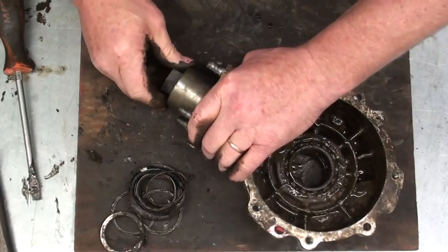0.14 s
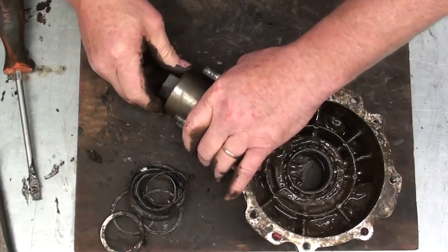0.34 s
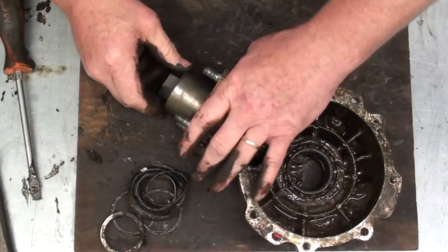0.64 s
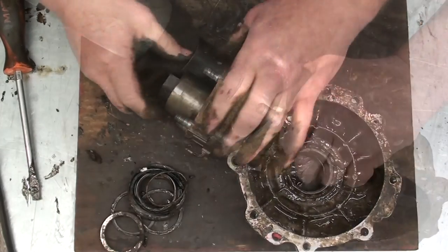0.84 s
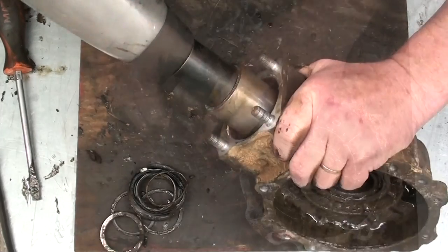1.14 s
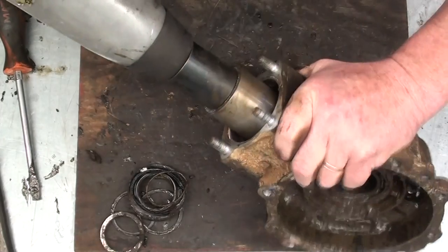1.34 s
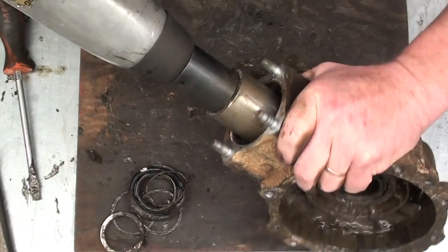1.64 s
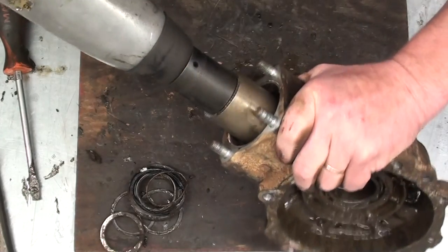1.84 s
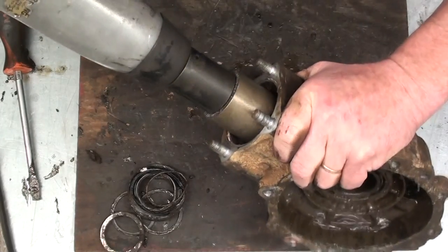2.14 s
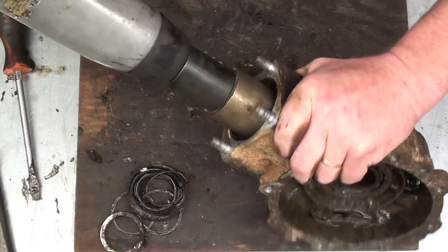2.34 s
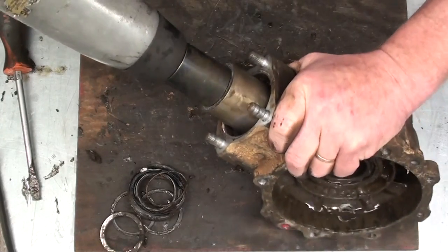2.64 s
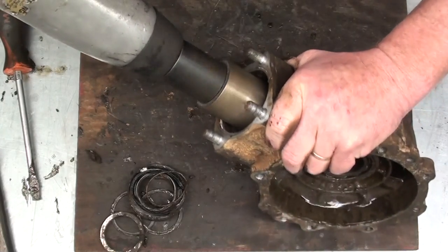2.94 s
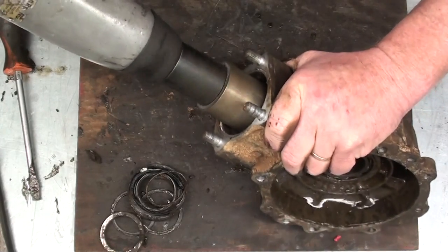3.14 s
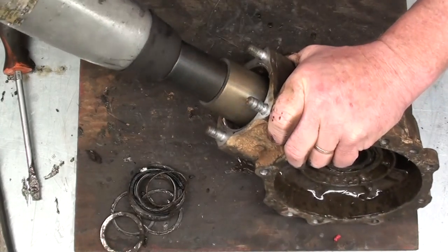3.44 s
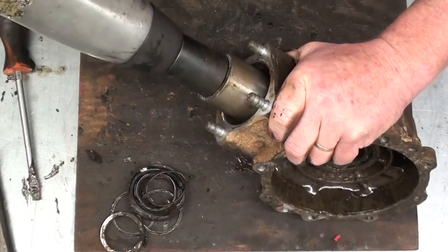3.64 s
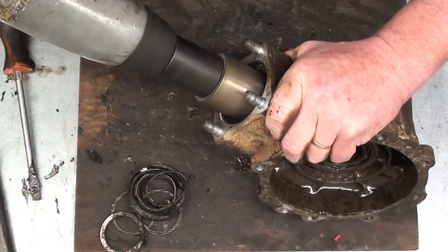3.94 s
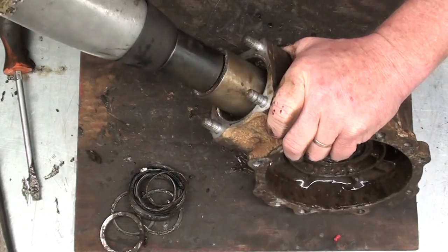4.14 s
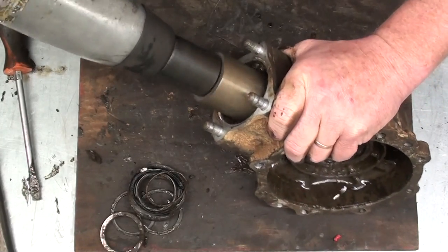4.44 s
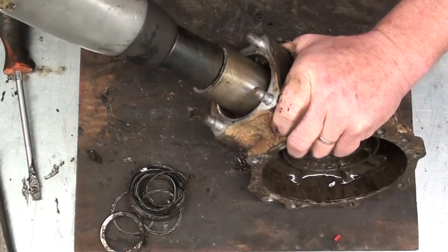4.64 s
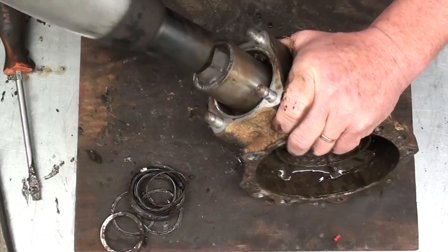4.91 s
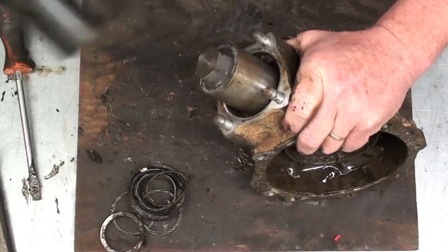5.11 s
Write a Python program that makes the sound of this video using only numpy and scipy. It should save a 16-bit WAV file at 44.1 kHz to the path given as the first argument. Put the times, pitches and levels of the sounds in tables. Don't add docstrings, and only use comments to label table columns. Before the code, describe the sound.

A heavy metal housing shifts on a wooden bench with dull knocks and faint ring ticks. From one second a close, very loud air wrench hammers a nut in fast metallic bursts with hissing exhaust. The nut loosens around three seconds, the socket rings brighter, and three short bursts follow before quiet. Hard-walled garage; the recorder's level dips at each blow.

```python
import sys
import numpy as np
from scipy import signal
from scipy.fft import rfft, irfft, next_fast_len
from scipy.io import wavfile
from scipy.ndimage import uniform_filter1d

SR = 44100
rng = np.random.default_rng(int(sys.argv[2]) if len(sys.argv) > 2 else 0)


def unload_audio(sound):
    columns = np.transpose(np.atleast_2d(sound))
    steps = np.round(np.clip(columns, -1, 1) * 32767)
    wavfile.write(sys.argv[1], SR, steps.astype(np.int16))


def ratio_of_db(decibels):
    return 10 ** (np.asarray(decibels, float) / 20)


N = 232520
TIME = np.arange(N) / SR
LATE_S = .0007
DUCK_DB = 15.5


def shape(x, table):
    hz, db = np.transpose(table)
    size = next_fast_len(N)
    log_hz = np.log(np.fft.rfftfreq(size, 1 / SR) + 1)
    gain = ratio_of_db(np.interp(log_hz, np.log(hz), db))
    return irfft(rfft(x, size) * gain, size)[..., :N]


def unit(x):
    return x / np.sqrt(np.mean(x ** 2))


def band(lo_hz, hi_hz):
    sos = signal.butter(2, [lo_hz, hi_hz], "band", fs=SR, output="sos")
    return unit(signal.sosfilt(sos, rng.standard_normal(N)))


def spikes(s, size):
    x = np.zeros(N)
    index = (np.asarray(s) * SR).astype(int)
    np.add.at(x, np.clip(index, 0, N - 1), size)
    return x


def fade(x, tau_s):
    return signal.lfilter([1], [1, -np.exp(-1 / (tau_s * SR))], x)


def ring(s, size, modes, scatter_db=2.5):
    out = 0
    chance = rng.standard_normal((len(s), len(modes), 2))
    for k, (hz, db, t60) in enumerate(modes):
        pole = np.exp(2j * np.pi * hz / SR - np.log(1000) / (t60 * SR))
        sign = np.where(chance[:, k, 1] > -3 / len(s) ** .4, 1, -1)
        push = size * ratio_of_db(db + scatter_db * chance[:, k, 0]) * sign
        out = out + signal.lfilter([1], [1, -pole], spikes(s, push) + 0j).imag
    return out


def notes(rows):
    out = 0
    for s, db, hz, t60 in rows:
        out = out - ring([s], ratio_of_db(db), [(hz, 0, t60)], scatter_db=1)
    return out


def gate(table, edge_s=0.012):
    s, *columns = np.transpose(table)
    corners = [s[0] - edge_s, s[0] + edge_s, s[-1] - edge_s, s[-1] + edge_s]
    on = np.interp(TIME, corners, [0, 1, 1, 0])
    return [on] + [np.interp(TIME, s, c) for c in columns]


# [t/s, peak level/dB, socket ring level/dB]
STUCK_BLOWS = [(1.0229, -12.5, -14), (1.069, -12.5, -7.5), (1.121, -6.5, -13), (1.356, -7, -16),
               (1.4075, -1, -7), (1.4539, -6, -23.5), (1.5056, -6, -15.5), (1.5618, -4, -24.5),
               (1.6123, -4.5, -9), (1.6664, -5.5, -13), (1.7196, -7, 4), (1.775, -12.5, -1),
               (1.8289, -7, -2.5), (1.8849, -9, -8), (1.9399, -5, -16.5), (2.1169, -10.5, -11),
               (2.165, -7.5, -2.5), (2.2154, -15.5, 7.5), (2.2694, -8.5, -1), (2.324, -9.5, -8),
               (2.3771, -8, -14.5), (2.433, -10, -18.5), (2.4865, -6.5, -15.5), (2.5405, -9, -14.5),
               (2.5975, -4.5, -13), (2.7707, -5, -7.5), (2.8247, -9.5, -4.5), (2.8815, -8, -17),
               (2.9334, -7, -25)]
# [t/s, peak level/dB, socket ring level/dB]
FREED_BLOWS = [(2.9935, -2.5, -1), (3.0439, -3, -4.5), (3.0952, -1, -10), (3.1481, -4.5, -0.5),
               (3.2088, -4.5, 4.5), (3.437, -10, 3.5), (3.4823, -4.5, 1.5), (3.5379, -4.5, 2.5),
               (3.6249, -12, 0), (3.8322, -7.5, 3), (3.8794, -12, 8), (3.9374, -8, 10.5),
               (4.0168, -12.5, 12), (4.335, -7, -17), (4.3842, -7.5, 3), (4.435, -11, 5.5),
               (4.584, -15.5, 2)]
BLOW_S = np.array(STUCK_BLOWS + FREED_BLOWS)[:, 0]
FREED_S = FREED_BLOWS[0][0]


def hammer_rows(usual_blow_db=-8, clank_stuck_db=-4.5, clank_freed_db=-6.5, clank_follows=.7):
    s, db, socket_db = np.transpose(STUCK_BLOWS + FREED_BLOWS)
    clank_db = np.where(s < FREED_S, clank_stuck_db, clank_freed_db)
    clank_db = clank_db + (clank_follows - 1) * (db - usual_blow_db)
    return np.transpose([s, db, socket_db, clank_db])


# [f/Hz, level/dB, T60/s]
ANVIL = [(5940, -7, .03), (6470, -4, .035), (6640, -8, .04), (6900, -4, .025), (7150, -5, .03),
         (7700, -8, .02)]
# [f/Hz, level/dB, T60/s]
SOCKET = [(11230, -1, .04), (11400, -3, .04), (11270, -29, .4), (11360, -30, .3), (10300, -9, .02),
          (8550, -8, .025)]
# [f/Hz, level/dB, T60/s]
HOUSING = [(1870, -8, .06), (2900, -7, .04), (3320, -3, .05), (3490, -1, .045), (3440, -25, .35),
           (3850, -2, .045), (4530, -1, .05)]


def strikes(table, lift_db, modes_db, crack_s):
    s, db, socket_db, clank_db = np.transpose(table)
    s = s + LATE_S
    socket_noise = 0.64 * band(10000, 12500) + 0.17 * band(12500, 16000)
    parts = [(0, ANVIL, band(5400, 9440), 1.2),
             (socket_db, SOCKET, socket_noise, .8),
             (clank_db, HOUSING, 0.84 * band(1100, 5600), 1.3)]
    out = 0
    for part_db, modes, noise, slowness in parts:
        size = ratio_of_db(db + lift_db + part_db)
        crack = uniform_filter1d(fade(spikes(s, size), slowness * crack_s), size=25)
        out = out + noise * crack + ratio_of_db(modes_db) * ring(s, size, modes)
    return out


def hammer():
    return strikes(hammer_rows(), lift_db=DUCK_DB - 4, modes_db=-10, crack_s=.0038)


# [t/s, peak level/dB, socket level/dB, housing clank level/dB]
RATTLES = [(.972, -19, -16, -2), (1.326, -13, -10, -6), (1.965, -13, -8, -7), (2.025, -18, -14, -8),
           (2.103, -11, -5, -8), (2.626, -13, -6, -9), (2.724, -9, -10, -8), (3.418, -15, -6, -10),
           (3.610, -14, -10, -2), (3.818, -11, -6, -9), (4.323, -8, -7, -9), (4.558, -25, -6, -6)]
# [t/s, peak level/dB, f/Hz, T60/s]
VALVE = [
    (.966, -24, 1248, .073),
    (.966, -27, 1594, 0.055),
    (.970, -18, 3130, .03),
    (2.088, -19, 2950, 0.05),
    (2.103, -15, 3120, .04),
]


def rattle():
    return strikes(RATTLES, lift_db=-4, modes_db=-12, crack_s=.004) + notes(VALVE)


def pull_curve(squeezed, released, stops, hiss_db, coast_db):
    top_db = 1 if released < FREED_S else 3.5
    first_flow_db, vane_db = -4.5, -31
    opened, built = squeezed + 0.032, min(squeezed + 0.056, released - .01)
    shut = min(released + 0.072, stops - .005)
    return [(squeezed, hiss_db - 4, -52.5, -7.5),
            (opened, hiss_db + first_flow_db, vane_db + first_flow_db, 0),
            (built, hiss_db, vane_db, top_db),
            (released, hiss_db, vane_db, top_db),
            (shut, coast_db, -38, -2.5),
            (stops, coast_db - 3, -45.5, -28.5)]


# [squeezed t/s, released t/s, rotor stops t/s, hiss level/dB, coasting hiss level/dB]
PULLS = [
    (.96, 1.08, 1.315, -20.5, -19),
    (1.315, 1.9, 2.03, -18.5, -25.5),
    (2.085, 2.599, 2.592, -18, -31.5),
    (2.715, 3.137, 3.215, -20, -23.5),
    (3.4, 3.534, 3.622, -19, -26.5),
    (3.8, 3.933, 4.01, -18, -26),
    (4.303, 4.428, 4.475, -19, -42),
]
# [f/Hz, level/dB per Hz]
HISS = [(410, -13), (700, -9), (997, -7), (1210, -1), (1870, -4), (2080, -1.5), (2800, 2), (3640, 1),
        (3890, 3), (4150, -2), (6920, 8), (8880, -2.5), (11400, -4), (12300, -14), (16000, -18)]
# [f/Hz, level/dB per Hz]
THUMP = [(18, -58.5), (30, -19), (86, -2.5), (214, 7.5), (374, 2), (446, 2), (826, -1.5), (1000, -16),
         (1300, -38.5), (2200, -120)]


def air_motor(stall_hz=105, spin_hz=270, spin_up_s=.04, restart_s=.022, puff_share=0.35,
              top_puff_share=0.55, creep_s=.012, swell_s=0.012):
    stops = np.sort(np.r_[BLOW_S, [pull[0] - .005 for pull in PULLS]])
    last = np.maximum(np.searchsorted(stops, TIME) - 1, 0)
    since = TIME - stops[last] - restart_s
    run = np.maximum(since + creep_s, 0)
    lag = (spin_hz - stall_hz) * spin_up_s * (1 - np.exp(-run / spin_up_s))
    turns = spin_hz * run - lag
    stall_angle = rng.random(len(stops))[last]
    passed = np.floor(turns + stall_angle) * (run > 0)
    vanes = np.flatnonzero(np.diff(passed) > 0)
    chance = rng.standard_normal((len(vanes), 2))
    size = ratio_of_db(1.2 * chance[:, 1]) * np.clip(run[vanes] / swell_s, .15, 1)
    pulses = spikes(vanes / SR + .0007 * chance[:, 0], size)
    puffs = unit(fade(fade(pulses, 0.00095), 0.0034))
    flow = np.clip(1 + since / .01, 0, 1)
    breath = unit(shape(rng.standard_normal(N), HISS))
    top = signal.sosfilt(signal.butter(4, 8500, "high", fs=SR, output="sos"), breath[::-1])
    body = signal.sosfilt(signal.butter(4, 8500, fs=SR, output="sos"), breath)
    gusts = (puff_share * puffs + 1 - puff_share) * (.5 + .5 * flow)
    spurts = (top_puff_share * puffs + 1 - top_puff_share) * (0.93 + 0.65 * flow)
    rough_pulses = .25 * puffs * rng.standard_normal(N) - unit(pulses)
    thump = unit(shape(rough_pulses, THUMP)) * (.3 + .7 * flow)
    out = 0
    for pull in PULLS:
        on, hiss_db, thump_db, top_db = gate(pull_curve(*pull), edge_s=0.0057)
        hiss = ratio_of_db(hiss_db) * (gusts * body + ratio_of_db(top_db) * spurts * top)
        out = out + on * (hiss + ratio_of_db(thump_db) * thump)
    return out


# [t/s, level/dB]
WHISTLE = [
    (1.0, -49),
    (1.028, -18),
    (1.076, -28),
    (1.198, -20.5),
    (1.29, -19),
    (1.384, -52),
    (1.416, -28),
    (1.45, -44.5),
]


def whistle():
    on, db = gate(WHISTLE)
    return on * ratio_of_db(db) * unit(band(1810, 1900) + band(1895, 2010))


# [t/s, peak level/dB, f/Hz, click level/dB, bench boom level/dB]
KNOCKS = [(.0109, -16, 292, -43, -14), (.0115, -19.5, 700, -46, -35), (.201, -18.5, 585, -9.5, -14),
          (.222, -26.5, 247, -22, -4.5), (.235, -29.5, 1820, -8, 4.5), (.257, -29.5, 1860, -6.5, -16.5),
          (.268, -29.5, 480, -34, -9), (.321, -31.5, 1980, -13.5, -8), (.3778, -23.5, 645, -18, -14.5),
          (.397, -34, 500, -18, 0), (.413, -31.5, 370, -15.5, -2), (.461, -34, 1740, -19, -13.5),
          (5.002, -42, 1500, -12, -37)]
# [t/s, peak level/dB, f/Hz]
TICKS = [
    (0.2444, -43, 7340),
    (0.3067, -45, 8010),
    (0.3356, -31.5, 7880),
    (0.3587, -40, 7980),
    (0.4323, -46, 8040),
    (5.1964, -70, 6190),
]
# [f/Hz, level/dB, T60/s]
BENCH = [(75, -1.5, 0.17), (131, 7.5, 0.099), (195.4, 6.5, 0.087), (223.5, -26, 0.028), (300, 9.5, 0.037),
         (490, -4.5, 0.11), (712, -16, 0.037)]


def bench():
    s, db, hz, click_db, boom_db = np.transpose(KNOCKS)
    t60 = 0.043 * (500 / hz) ** 0.64
    boom = -ring(s, ratio_of_db(db + boom_db - 7), BENCH, scatter_db=1.5)
    click = band(4800, 8300) * fade(fade(spikes(s, ratio_of_db(db + click_db - 44.5)), 0.0031), 0.0045)
    thud = band(230, 1710) * fade(spikes(s, ratio_of_db(db - 10)), 0.008)
    ticks = notes([(*row, .012) for row in TICKS])
    return boom + click + thud + notes(zip(s, db, hz, t60)) + ticks


# [f/Hz, T60/s]
GARAGE_T60 = [(100, 0.6), (300, 1), (700, 0.67), (1800, 1.0), (5000, 0.75), (9000, 0.46), (14000, 0.21)]


def garage(x, gap_s=0.006):
    t = TIME[:int(1.2 * SR)]
    hz, t60 = np.transpose(GARAGE_T60)
    tail = 0
    for centre in 60 * 2 ** np.arange(0, 8.1, .5):
        decay = np.interp(np.log(centre), np.log(hz), t60)
        edges = [centre / 2 ** .25, centre * 2 ** .25]
        sos = signal.butter(2, edges, "band", fs=SR, output="sos")
        tail = tail + signal.sosfilt(sos, rng.standard_normal((2, len(t)))) * ratio_of_db(-60 * t / decay)
    tail = tail * np.clip(t / gap_s - 1, 0, 1)
    tail = tail / np.sqrt(np.sum(tail[0] ** 2))
    return signal.fftconvolve(x[None], tail, axes=1)[:, :N]


# [f/Hz, level/dB per Hz]
SHOP = [(18, -36), (30, -19), (112, 5.5), (171, -11.5), (235, -1.5), (547, -6.5), (814, -6.5), (1270, -13),
        (3050, -17), (4070, -14.5), (4770, -18), (15200, -23), (16500, -37)]
# [t/s, level/dB]
SHOP_LEVEL = [
    (0, -50),
    (.45, -50.5),
    (.95, -54),
    (5.05, -65.5),
    (5.112, -69),
    (5.27, -69),
]
# [f/Hz, width/Hz, level/dB]
LAMP = [(104, 12, -61.5), (253, 4.1, -62), (3944, 100, -61.5), (5460, 60, -86.5), (8600, 150, -76),
        (10550, 80, -77)]


def shop():
    db = np.interp(TIME, *np.transpose(SHOP_LEVEL))
    whines = 0
    for hz, width, peak_db in LAMP:
        whines = whines + ratio_of_db(peak_db) * band(hz - width / 2, hz + width / 2)
    whines = whines * ratio_of_db(1.2 * (db - db.max()) + 3.0)
    noise = unit(shape(rng.standard_normal((2, N)), SHOP)) * ratio_of_db(db)
    return noise * ratio_of_db(np.array([[0], [-9]])) + whines * np.array([[1], [.2]])


# [f/Hz, level/dB]
SEND = [(60, -27), (220, -4), (450, -1.5), (1000, -2), (8000, -3.5), (12000, -5), (15000, -6)]
# [f/Hz, level/dB]
SIDE_DB = [(60, -23), (110, -26), (200, -22.5), (380, -22), (700, -14.5), (1290, -19), (2380, -22.5),
           (4400, -16), (8120, -16.5), (15000, -19.5)]
# [f/Hz, level/dB]
LEAN = [(100, 1.9), (500, 3), (1000, 1), (3000, -0.9), (15000, 0.45)]


def scene():
    tool = hammer() + rattle()
    air = ratio_of_db(1.0) * air_motor() + ratio_of_db(-3.5) * whistle()
    knocks = bench()
    dry = tool + air + knocks
    to_walls = ratio_of_db(-15.5) * tool + ratio_of_db(-5.5) * air + ratio_of_db(-10.5) * knocks
    mid, side = garage(shape(to_walls, SEND))
    floor = shop()
    apart = dry - np.roll(dry, 9)
    side = shape(ratio_of_db(6.0) * side + 0.55 * apart, SIDE_DB) + floor[1]
    mid = mid + dry + floor[0]
    left_tilt = [(hz, db / 2) for hz, db in LEAN]
    right_tilt = [(hz, -db / 2) for hz, db in LEAN]
    return np.array([shape(mid + side, left_tilt), shape(mid - side, right_tilt)])


def band_limit(x):
    return signal.sosfilt(signal.butter(12, 16990, fs=SR, output="sos"), x)


def record(dry, ahead_s=0.0024, slew_s=.0012, release_s=0.012):
    blows = spikes(BLOW_S + LATE_S, DUCK_DB)
    ahead = int(ahead_s * SR)
    early_db = np.convolve(blows, np.ones(ahead))[ahead:]
    duck_db = np.maximum(early_db, fade(blows, release_s)[1:])
    gain = ratio_of_db(-uniform_filter1d(np.r_[duck_db, 0], int(slew_s * SR)))
    bass_cut = signal.butter(2, 55, "high", fs=SR, output="sos")
    rounded = np.tanh(1.5 * signal.sosfilt(bass_cut, dry) * gain) / 1.5
    top_cut = signal.ellip(8, .2, 45, 15900, fs=SR, output="sos")
    return band_limit(signal.sosfilt(top_cut, rounded))


dry = scene()
out = record(dry)
unload_audio(out)
```